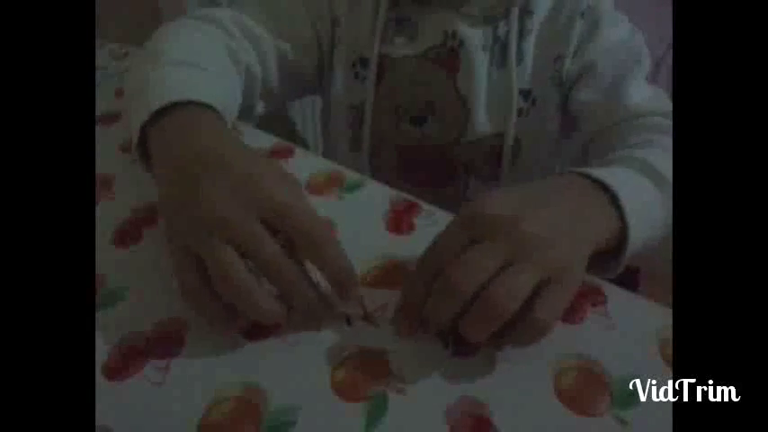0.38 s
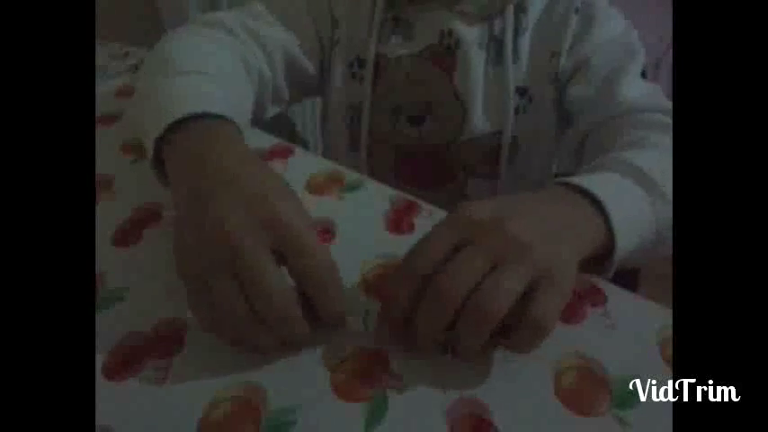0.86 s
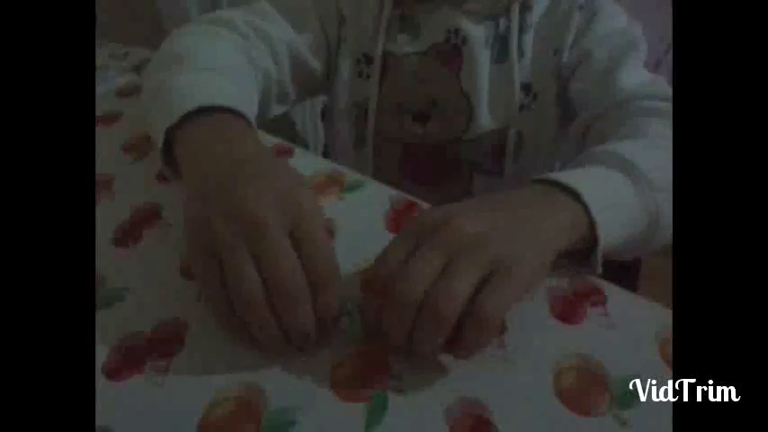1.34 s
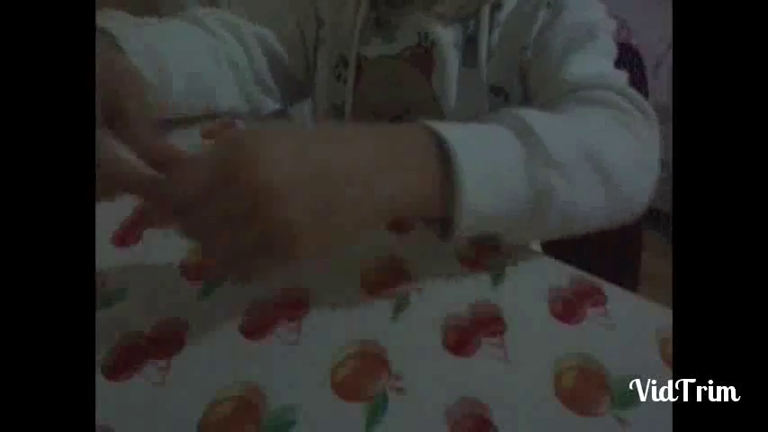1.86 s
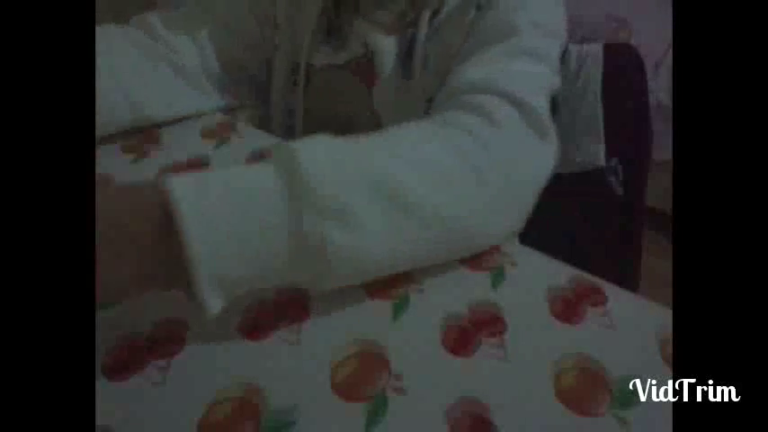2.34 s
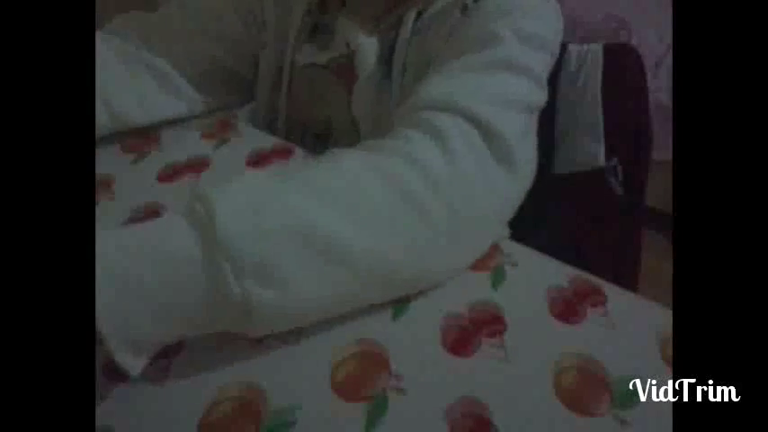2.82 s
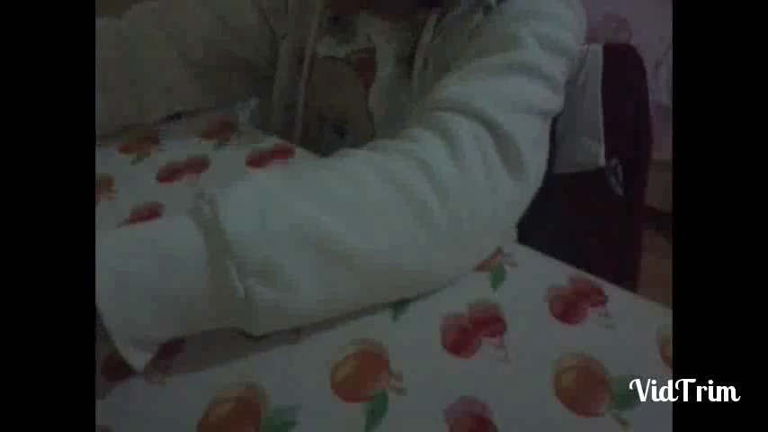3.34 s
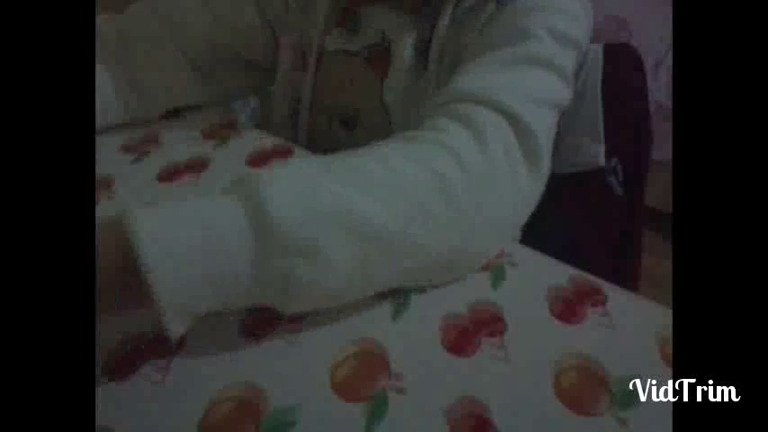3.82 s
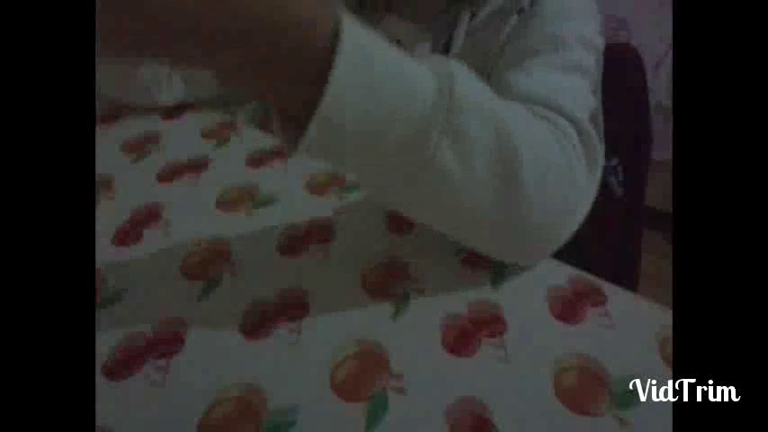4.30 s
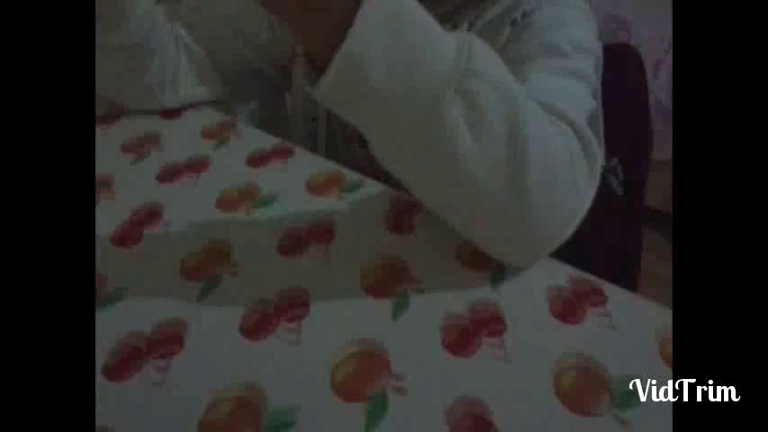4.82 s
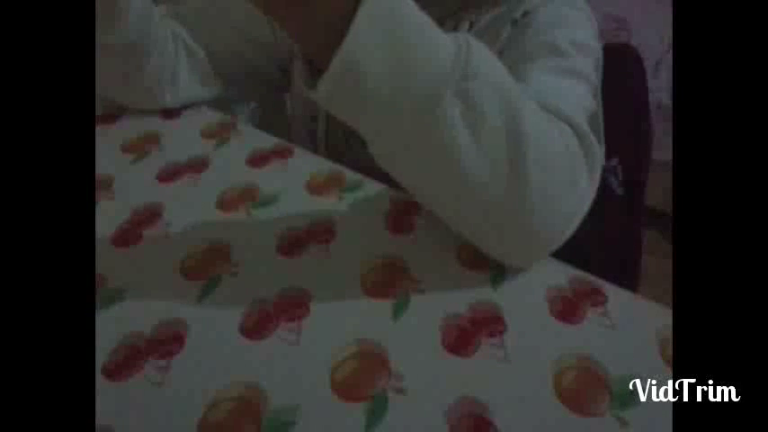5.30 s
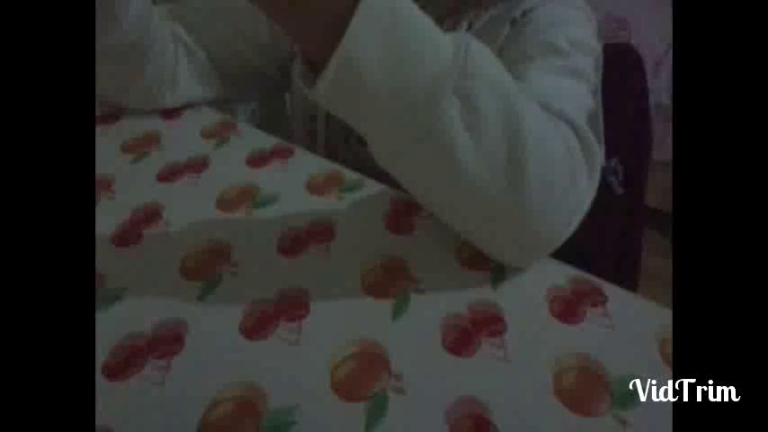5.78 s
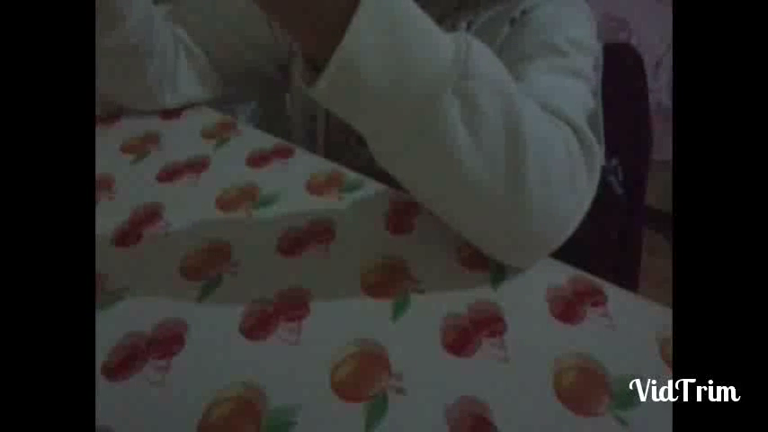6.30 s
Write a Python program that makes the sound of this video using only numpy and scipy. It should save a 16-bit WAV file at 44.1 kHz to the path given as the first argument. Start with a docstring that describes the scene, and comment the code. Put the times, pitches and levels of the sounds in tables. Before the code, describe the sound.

Hands shuffle softly at a covered table, tear tape from a roll with one harsh stuttering rip, then leave a few crisp snaps and tiny ticks.

```python
"""Hands at a cloth-covered table in a small room: at first sleeves and paper rustle (flickering noise grains)
amid bumps (damped table modes) and ticks (short noise bursts). Just before 3 s tape leaves its roll in a run
of stick-slip cracks; they pluck the freed strip, and a wall echo and a lumpy room tail answer them.
Sharp snaps follow near 3.4, 3.7 and 4.7 s, then sparser rustles and ticks to the end. Throughout lie
room tone, faint throbbing bands and a thin whine."""
import sys
import numpy as np
from scipy import signal
from scipy.fft import rfft, irfft
from scipy.io import wavfile
from scipy.ndimage import uniform_filter1d

SR = 44100
rng = np.random.default_rng(int(sys.argv[2]) if len(sys.argv) > 2 else 0)


def dump_mix(stems):
    """Bounce the given channels to the path in sys.argv[1] as a 16-bit WAV at rate SR."""
    frames = np.atleast_2d(stems).T  # one column per channel
    limited = np.clip(frames, -1, 1)  # hard clip at full scale
    pcm = np.round(limited * 32767).astype(np.int16)
    wavfile.write(sys.argv[1], SR, pcm)


def convert_level_to_amplitude(level_db):
    """Map a level in decibels to its linear amplitude factor."""
    exponent = np.asarray(level_db, float) / 20
    return 10 ** exponent


N = 293706
TIME = np.arange(N) / SR
BODY_TOP_HZ, FIZZ_FROM_HZ = 2800, 9000  # body, hiss and fizz meet here

# glue letting go as tape leaves its roll: t/s, level/dB, decay time/ms, share sent to the room/dB
GLUE_SLIPS = [(2.7284, 1.5, 0.19, 2), (2.7647, -4, 0.98, -2), (2.7723, -15.5, 2.6, -4),
              (2.7929, -6.5, 1.5, 4.5), (2.808, -9.5, 1.2, -6.5), (2.831, -6.5, 1.7, 1),
              (2.8494, -6.5, 2.8, 4.5), (2.8796, -5, 1.9, -11.5), (2.8985, -4, 2.9, -6.5),
              (2.9204, -2, 1.1, -2.5), (2.9373, -18.5, .74, -4), (2.9441, -7.5, 1.5, 1),
              (2.9561, -9, 3.9, -6), (2.966, -11.5, .8, -14), (2.9701, -0.5, 1.4, -13),
              (2.9736, -4, .9, 1.5), (2.98, 0.5, 1.3, -4.5), (2.9865, -7.5, 4.5, 2.5),
              (2.997, -9.5, 2.3, -5), (3.0454, 0, .6, -7), (3.0628, -3.5, .72, -5), (3.086, -5.5, 1.45, 1),
              (3.1405, -6, 1.96, -2)]
# paper and tape ends ticking and snapping:
# t/s, level/dB, relative body level/dB, decay time/ms, share sent to the room/dB
TICK_EVENTS = [(.074, -37, -25, 1.8, -6), (0.2964, -35, 6, 1.7, -11), (.4645, -54.5, 19, 5.4, -9),
               (0.4749, -28, -4, 1.6, 0), (0.6925, -35.5, -11, 6.4, -16), (1.2752, -39, -5, .68, -6),
               (1.327, -39.5, 20.5, 1.9, 6.5), (1.746, -34, -19, 1, 11.5), (1.888, -48, 2, 1.5, 8),
               (2.005, -31, 1, 0.98, -7), (2.106, -33, -35, 0.91, -2), (2.126, -28, -16, 0.86, -11),
               (2.617, -35, -1, 1.2, 3.5), (2.7044, -36, -31, .8, 14.5), (2.7218, -31.5, -6, 6.5, -7.5),
               (3.253, -22.5, -21, 0.94, 3.5), (3.294, -26, -15, 3.2, 3), (3.3372, -30.5, -16, 2, 6),
               (3.3568, -26.5, -26, 1, -9), (3.3634, -1, -22, 0.36, 2), (3.3654, 1, -21, 0.57, 4),
               (3.5844, -52, -25, 3.6, 2), (3.66, -40, -7, 0.84, 5), (3.672, -33, -29, 2.3, -19.5),
               (3.6757, -18.5, -42, 2.7, -4), (3.6828, -9, -47, 1.7, -12.5),
               (3.6954, -13.5, -37, 5.2, -2.5), (3.698, -12.5, -17, 2.9, 1), (3.7015, -10.5, -39, 1.3, -5),
               (3.735, -24.5, -17, 3.4, -54), (3.7878, -36.5, -20, 2.1, -5), (4.3573, -40, -13.5, .43, -10),
               (4.4383, -35, -20, 2, 8.5), (4.4456, -29.5, -27, 2, -27), (4.4697, -32.5, -15.5, 1.5, -24),
               (4.504, -28.5, -7, 2.3, -40), (4.5986, -32.5, -22, 1.3, -7), (4.611, -22.5, -14, 2.9, 4),
               (4.6527, -7, -20, 0.71, 2), (4.6542, -10, -22.5, 1.8, -10), (4.9835, -32, -22.5, 7.7, -8),
               (4.9894, -37.5, -37, 2.8, -16), (5.4361, -57.5, 2, 1.5, 5.5),
               (5.4691, -40.5, -21.5, .7, -6.5), (6.043, -26, -25.5, 1.3, -8),
               (6.2159, -28.5, -24, 2.6, -5), (6.2238, -35, -8, 1.2, -11), (6.24, -49, 3, 1.2, 0),
               (6.3484, -46.5, -25, 1.5, -2.5), (6.609, -39, -5, 1.3, -4.5), (6.631, -42, -23.5, 1.4, 6.5)]
# spectrum of a crack: f/Hz, relative level/dB
CRACK_SPECTRUM = [(410, -58), (700, -38.5), (1200, -28), (1750, -13.5), (2700, -18), (3160, -14.5),
                  (3740, -11), (4860, -2.5), (5540, -2.5), (6230, 1), (7010, -3), (8100, -11),
                  (12800, -20.5), (15200, -31.5), (16000, -41.5)]
# hands, sleeves and paper sliding:
# t/s, length/s, level at start/dB, level at end/dB, relative body level/dB
SLIDING_STROKES = [(0, 0.075, -41, -39.5, -10), (0.173, 0.062, -44.5, -49.5, -11.5),
                   (0.286, 0.0076, -40.5, -39.5, -9), (0.486, 0.0058, -36.5, -43.5, -9.5),
                   (0.588, 0.062, -44, -45, -11), (0.705, 0.005, -40.5, -55, -9.5),
                   (0.727, 0.078, -51.5, -51.5, -10.5), (0.855, 0.038, -43.5, -54.5, -10),
                   (0.938, 0.032, -41, -36.5, -11.5), (1.046, 0.14, -38, -41.5, -10),
                   (1.297, 0.03, -43.5, -47, -11.5), (1.366, 0.031, -33.5, -32, -16.5),
                   (1.424, 0.38, -45, -48, -14.5), (1.88, 0.17, -46.5, -45, -14),
                   (2.043, 0.078, -38.5, -36, -20.5), (2.151, .12, -47, -51.5, -15),
                   (2.283, 0.24, -51, -45.5, -14), (2.528, 0.15, -46.5, -49.5, -13),
                   (3.173, 0.12, -43, -46.5, -16.5), (3.523, 0.21, -73, -65, -5.5),
                   (3.762, 0.095, -44.5, -61, -14), (3.863, 0.57, -57, -69, -9.5),
                   (4.309, 0.23, -59.5, -63, -12.5), (4.505, 0.1, -51, -58, -11.5),
                   (4.616, 0.06, -41, -36.5, -34), (4.786, 0.12, -67.5, -63.5, -2),
                   (4.954, 0.13, -59.5, -67.5, -8.5), (5.668, 0.017, -70.5, -74, -13),
                   (6.259, 0.25, -65, -81, -11), (6.56, .1, -73, -67, -13)]
# spectrum of the rustle: f/Hz, relative level/dB
RUSTLE_SPECTRUM = [(300, -49.5), (500, -32), (790, -16.5), (1230, -13.5), (1600, -18), (1960, -11.5),
                   (2360, -16.5), (2600, -13.5), (3900, -8), (5100, 1), (6300, -2), (7200, -14),
                   (9400, -24.5), (15000, -30.5)]
# bumps against the table: t/s, level/dB, then relative level/dB of the lowest, middle and upper modes
TABLE_BUMPS = [(0.029, -49.5, -7.5, -11.5, -37), (0.295, -59, -2, -25, -25), (0.689, -57.5, -8, -13, -14.5),
               (1.698, -53, -1, 0.5, -12), (1.929, -44.5, 2, -2.5, -31), (2.368, -50.5, -13, -22, -37),
               (2.508, -46, -27.5, -4, -14), (2.971, -38.5, -11.5, -11, -32),
               (3.37, -38, -31.5, -2.5, -9.5), (3.701, -28, -14.5, -7.5, -12.5),
               (4.268, -64, -10, -16, -15), (4.656, -39, -4.5, -16, -42), (4.899, -59, -27, 3, -2),
               (6.219, -58.5, -13.5, -6, -17)]
# normal modes of the table: f/Hz, relative level/dB, 60 dB decay time of a bump/s
TABLE_MODES = [(60, 6.5, 0.16), (139.6, -4, 0.25), (180.7, 0, 0.078), (262.6, 1.5, .12), (316.5, -0.5, .1),
               (346.5, -1, 0.087), (486, -0.5, 0.031), (564, -4.5, 0.028)]
# weight of arms and pull of the roll on the table: t/s, load/dB
TABLE_LOAD = [(0, -61), (.2, -69.5), (.46, -73.5), (.74, -68.5), (.9, -70.5), (1.3, -63), (1.5, -61),
              (1.63, -71.5), (2.05, -65.5), (2.69, -63), (2.74, -41.5), (2.87, -37), (3.0, -46),
              (3.17, -44), (3.3, -67), (3.97, -69), (4.4, -77), (4.85, -69.5), (5.12, -88.5), (6.66, -83.5)]
# reverberation time of the room: f/Hz, 60 dB decay time/s
REVERB_TIME = [(1000, 0.23), (2000, 0.25), (5000, 0.25), (12000, 0.21)]
# spectrum of the tail after a crack: f/Hz, relative level/dB
TAIL_SPECTRUM = [(410, -57), (900, -29.5), (1250, -27), (1880, -17), (2340, -22.5), (3550, -14),
                 (4100, -12.5), (5200, -1.5), (6500, -7.5), (8000, -15.5), (10500, -24.5), (12000, -34.5),
                 (15000, -41.5)]
# spectrum of the room tone: f/Hz, relative level/dB
TONE_SPECTRUM = [(18, -28), (30, -15.5), (194, -10), (300, -12), (630, -14.5), (850, -16), (3000, -20.5),
                 (7100, -23.5), (15000, -22)]
# faint bands at the microphone's peaks: f/Hz, width/Hz, level/dB, throb either way/dB
FAINT_BANDS = [(4900, 260, -80, -5), (5850, 500, -81, 4)]
# thin electronic whine, before its throb: t/s, level/dB
WHINE_LEVEL = [(0, -74), (.37, -81), (2.71, -81), (2.95, -71), (3.1, -76), (3.45, -83), (4.23, -86),
               (4.65, -80), (5.36, -89), (6.66, -88)]


def unit(x):
    """Normalisation to unit rms."""
    return x / np.sqrt(np.mean(x ** 2))


def unit_energy(x):
    """Normalisation to unit energy."""
    return x / np.sqrt(np.sum(x ** 2))


def response(points, size=1024):
    """Minimum-phase principle: folding the cepstrum of the log gain makes the response causal."""
    hz, db = np.transpose(points)
    grid = np.maximum(np.arange(size + 1) * SR / (2 * size), 1)
    cepstrum = irfft(np.interp(np.log(grid), np.log(hz), db) * np.log(10) / 20)
    cepstrum[1:size] *= 2
    cepstrum[size + 1:] = 0
    return irfft(np.exp(rfft(cepstrum)))[:size]


def butter(x, order, hz, kind):
    """Butterworth filtering: a maximally flat passband."""
    return signal.sosfilt(signal.butter(order, hz, kind, fs=SR, output="sos"), x)


def three_bands(points):
    """Band division: body, hiss and fizz parts of one spectrum, each of unit energy."""
    h = response(points)
    body = butter(h, 3, BODY_TOP_HZ, "low")
    hiss = butter(h, 3, [BODY_TOP_HZ, FIZZ_FROM_HZ], "band")
    fizz = butter(h, 3, FIZZ_FROM_HZ, "high")
    return [unit_energy(part) for part in (body, hiss, fizz)]


def through(x, h):
    """Linear system: the output is the input convolved with the impulse response."""
    return signal.fftconvolve(x, h)[:N]


def walk(rate):
    """Random modulation: values held 1 / rate s, then smoothed twice; rms near 0.8."""
    k = int(SR / rate)
    held = np.repeat(rng.standard_normal(N // k + 1), k)
    return 1.04 * uniform_filter1d(uniform_filter1d(held, k), k)[:N]


def ring(push, hz, t60):
    """Damped harmonic oscillator: a push excites a sine that decays by 60 dB in t60 seconds."""
    pole = np.exp(2j * np.pi * hz / SR - np.log(1000) / (t60 * SR))
    return signal.lfilter([1], [1, -pole], push).imag


def cracks(size=600):
    """Stick-slip and fracture: each release is a sharp, lumpy noise burst; also returns energy for the room."""
    rows = [(s, db, -15.5, -11.5, ms, room_db) for s, db, ms, room_db in GLUE_SLIPS]
    for s, db, body_db, ms, room_db in TICK_EVENTS:
        # a harder snap is slightly brighter; a tick with much body loses its fizz
        fizz_db = -22.5 + 0.13 * (db + 31) - 4.1 * max(body_db + 9, 0)
        rows.append((s, db, body_db, fizz_db, ms, room_db))
    t = np.arange(size) / SR
    chance = rng.standard_normal((len(rows), 2, size))
    bands = three_bands(CRACK_SPECTRUM)
    near, far = np.zeros(N + size), np.zeros((3, N))
    for (s, level_db, body_db, fizz_db, ms, room_db), (noise, spike) in zip(rows, chance):
        # fractures differ widely in size, so the burst is lumpy
        decay = np.exp(-(t / (max(ms, .2) / 1000)) ** 1.3)
        burst = noise * convert_level_to_amplitude(3.0 * spike) * decay
        i = int(s * SR)
        strength = convert_level_to_amplitude(level_db - 4.5) * np.sqrt(ms * SR / 1000)  # a longer burst holds more energy
        for db, h in zip((body_db, 0, fizz_db), bands):
            part = signal.fftconvolve(burst, h)[:size]
            near[i:i + size] += strength * convert_level_to_amplitude(db) * unit_energy(part)
        # a dull or bright crack tints its tail the same way, less strongly
        tint_db = np.array([0.58 * (body_db + 23.5), 0, .6 * (fizz_db + 22.5)])
        far[:, i] += (strength * convert_level_to_amplitude(room_db + tint_db)) ** 2
    return near[:N], far


def strip():
    """Plucked strip: each slip after the first excites two partials, lower and fainter as the strip lengthens."""
    first_hz, from_s, growth_per_s = 2080, 2.77, 2.2
    level_db, t60_s, fade_db_per_s = -16.5, 0.026, 60
    out, t = np.zeros(N), np.arange(SR // 10) / SR
    for (s, db, *_), detune in zip(GLUE_SLIPS[1:], rng.standard_normal((len(GLUE_SLIPS), 2))):
        since = max(s - from_s, 0)
        ratios = np.array([[1], [1.55]]) * (1 + .04 * detune[:, None])
        hz = first_hz / (1 + growth_per_s * since) * ratios
        tone = np.array([1, .6]) @ np.sin(2 * np.pi * hz * t) * convert_level_to_amplitude(-60 * t / t60_s)
        out[int(s * SR):][:len(t)] += convert_level_to_amplitude(db + level_db - fade_db_per_s * since) * tone
    return out


def rustle():
    """Sliding friction: dense fibre grains whose bands flicker; each stroke swells, slides and dies away."""
    attack_db_per_s, release_db_per_s = 448.5, 319
    power = np.zeros((3, N))
    for s, length, start_db, end_db, body_db in SLIDING_STROKES:
        span = slice(max(int((s - .15) * SR), 0), int((s + length + .25) * SR))
        t = TIME[span] - s
        db = np.interp(t, [0, length], [start_db, end_db])
        db = db + attack_db_per_s * np.minimum(t, 0) - release_db_per_s * np.maximum(t - length, 0)
        # a firmer stroke is duller; one with little body is brighter
        fizz_db = -13 - 0.5 * np.maximum(db + 44, -12) - 0.45 * (body_db + 15.5)
        power[:, span] += convert_level_to_amplitude([db + body_db, db, db + fizz_db]) ** 2
    grains = unit(rng.standard_normal(N) * convert_level_to_amplitude(2.4 * walk(500) + 1.5 * walk(60)))
    out = 0
    for p, h in zip(power, three_bands(RUSTLE_SPECTRUM)):
        out = out + np.sqrt(p) * convert_level_to_amplitude(0.89 * walk(30)) * through(grains, h)
    return out


def table():
    """Modal excitation: bumps, their shudder and the steady working of arms and roll ring the same modes."""
    # each triple: lowest, middle, upper modes
    bump_gain_db = (9, 5, 5)
    load_share_db, load_slope = (-67.5, -61, -66.5), (0.67, 1, 0.98)  # level at -60 dB load; dB per dB
    shudder_db, shudder_t60_s = (-11.5, -2, -3.5), (0.6, .35, 0.25)  # the table trembles on after a bump
    out = 0
    load_db = np.interp(TIME, *np.transpose(TABLE_LOAD)) + 60
    jiggle = rng.standard_normal(N) * convert_level_to_amplitude(1.8 * walk(30))
    soft_push = np.hanning(90) / 45  # sleeve-padded, about 2 ms
    swell = np.hanning(int(9.6 * SR / 1000))  # the shudder builds up over 9.6 ms
    for hz, db, t60 in TABLE_MODES:
        bumps = np.zeros(N)
        group = int(hz > 100) + int(hz > 210)
        for s, level_db, *share_db in TABLE_BUMPS:
            bumps[int(s * SR)] += convert_level_to_amplitude(level_db + share_db[group] + db)
        load = convert_level_to_amplitude(load_share_db[group] + load_slope[group] * load_db + db)
        fade = convert_level_to_amplitude(-60 / (shudder_t60_s[group] * SR))
        shudder = through(signal.lfilter([1], [1, -fade], bumps), swell / swell.sum())
        load = load + convert_level_to_amplitude(shudder_db[group]) * shudder
        out = out + convert_level_to_amplitude(bump_gain_db[group]) * ring(through(bumps, soft_push), hz, t60)
        # the loaded mode is damped more and rung twice over
        working = ring(ring(jiggle, hz, 0.46 * t60), hz, 0.46 * t60)
        out = out + load * unit(working)
    return out


def wall(near, size=700):
    """Early reflection: the near wall returns each crack once, smeared over a millisecond or two and duller."""
    delay_ms, level_db = 9, -18
    spread = np.exp(-((np.arange(size) / SR - delay_ms / 1000) / 0.00099) ** 2)
    echo = butter(rng.standard_normal(size) * spread, 2, 8000, "low")
    return convert_level_to_amplitude(level_db) * through(near, unit_energy(echo))


def room(far):
    """Reverberation: a lumpy tail, built up over some ms; the hands move, so no two tails are alike."""
    build_up_ms = 5.6
    late_db, late_t60_s = -26, 0.57  # a faint, slower end of the tail
    t = np.arange(SR // 2) / SR
    noise, out = rng.standard_normal(N) * convert_level_to_amplitude(1.6 * walk(250)), 0
    t60_hz, t60_s = np.transpose(REVERB_TIME)
    for hz in 560 * 2 ** np.arange(0, 5, .5):  # half-octave bands
        t60 = np.interp(np.log(hz), np.log(t60_hz), t60_s)
        power = convert_level_to_amplitude(-120 * t / t60) + convert_level_to_amplitude(2 * late_db - 120 * t / late_t60_s)
        power = power * np.clip(t / (build_up_ms / 1000), 0, 1) ** 4
        power = power / power.sum()
        sent = far[int(hz > BODY_TOP_HZ) + int(hz > FIZZ_FROM_HZ)]
        band = butter(noise, 2, [hz / 2 ** .25, hz * 2 ** .25], "band")
        # each band swells and dips on its own as echoes arrive
        envelope = np.sqrt(np.maximum(through(sent, power), 0))
        out = out + band * convert_level_to_amplitude(2.2 * walk(70)) * envelope
    return through(out, unit_energy(response(TAIL_SPECTRUM)))


def quiet():
    """Stationary noise and amplitude modulation: room tone, with faint bands and a whine that throb."""
    throb = np.cos(2 * np.pi * 14.913 * TIME + 1.95)  # the electronics throb about 15 times a second
    hiss = through(rng.standard_normal(N), response(TONE_SPECTRUM, size=4096))
    tone = convert_level_to_amplitude(-72 + 1.2 * walk(6.7)) * unit(hiss)
    for hz, width, db, throb_db in FAINT_BANDS:
        band = butter(rng.standard_normal(N), 2, [hz - width / 2, hz + width / 2], "band")
        tone = tone + convert_level_to_amplitude(db + throb_db * throb + 1.5 * walk(29)) * unit(band)
    whine = np.sqrt(2) * np.sin(2 * np.pi * 14998 * TIME + 1.488 * walk(40))  # its phase wanders
    whine_db = np.interp(TIME, *np.transpose(WHINE_LEVEL)) + 9 * np.tanh(2 * throb) + 2 * walk(40)
    return tone + convert_level_to_amplitude(whine_db) * whine


def scene():
    """Superposition: all sources add at the centre; a noisy treble above 6.5 kHz is heard wide when it is soft."""
    near, far = cracks()
    near = near + strip()
    soft = room(far) + rustle() + quiet()
    soft = signal.sosfilt(signal.ellip(8, .2, 50, 15150, fs=SR, output="sos"), soft)
    thud = butter(table(), 3, [61.6, 664], "band")
    mid = near + wall(near) + soft + thud
    smear = rng.standard_normal(300) / np.sqrt(300)
    treble = signal.sosfilt(signal.ellip(5, .5, 40, 6570, "high", fs=SR, output="sos"), soft)
    wide = through(treble, smear)
    # loud moments, well above -32 dB, collapse to the centre
    loudness = np.sqrt(uniform_filter1d(mid ** 2, 2000))
    wide = convert_level_to_amplitude(-3.5) * wide / (1 + (loudness / convert_level_to_amplitude(-32)) ** 3)
    # the wide treble has opposite signs left and right
    return mid + wide * np.array([[1], [-1]])


def roll_off(x):
    """The treble ends steeply here."""
    return signal.sosfilt(signal.butter(12, 16470, fs=SR, output="sos"), x)


def record(dry):
    """Amplitude limiting: peaks beyond full scale are clipped."""
    mix = np.clip(dry, -1, 1)
    return roll_off(mix)


dry = scene()
out = record(dry)
dump_mix(out)
```